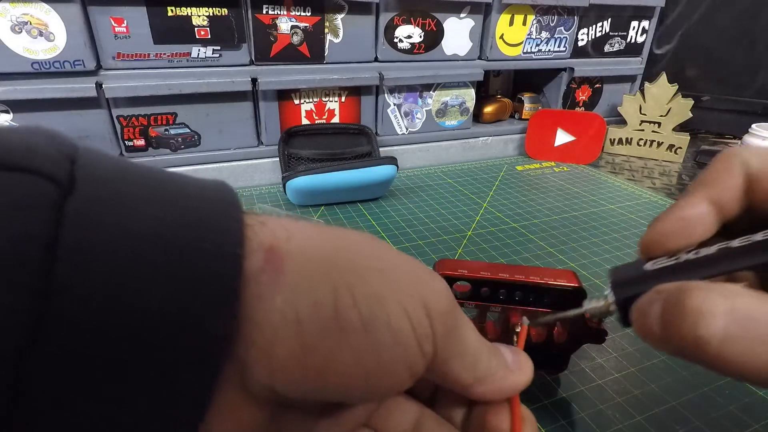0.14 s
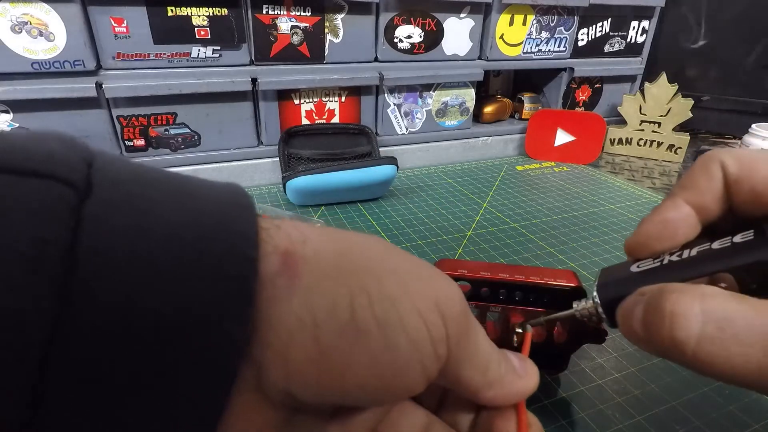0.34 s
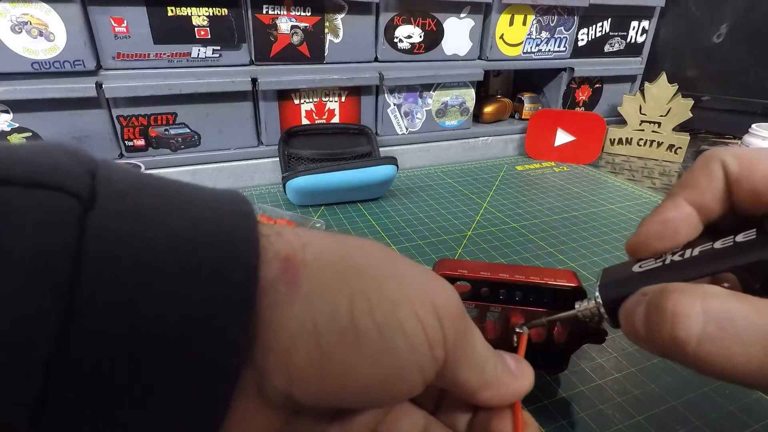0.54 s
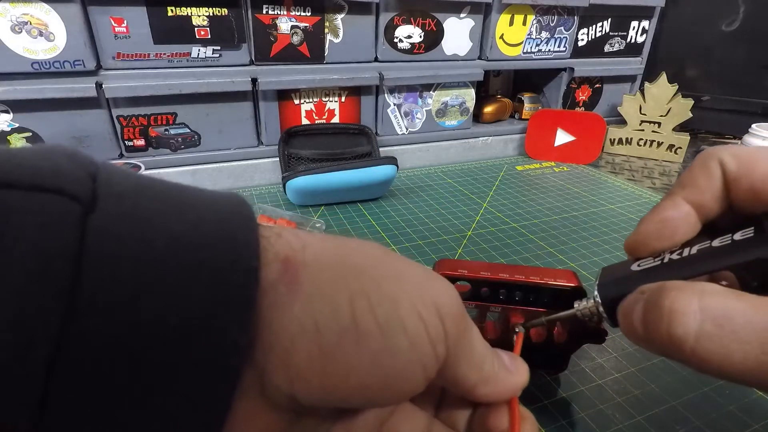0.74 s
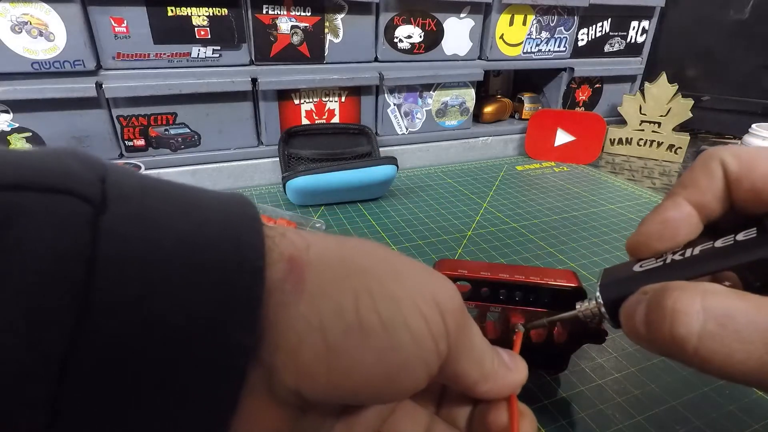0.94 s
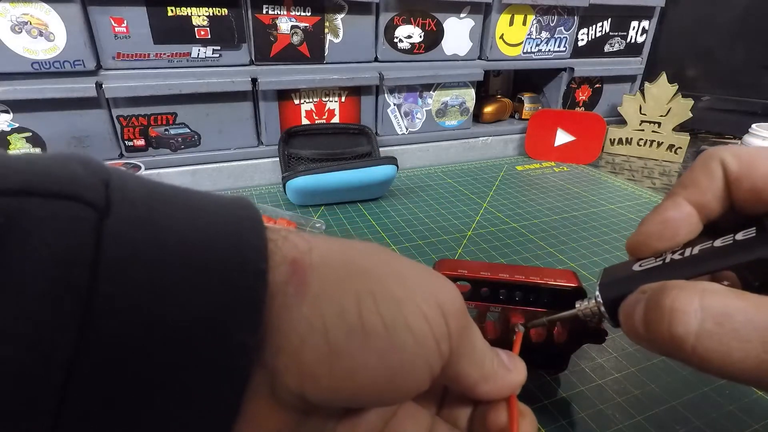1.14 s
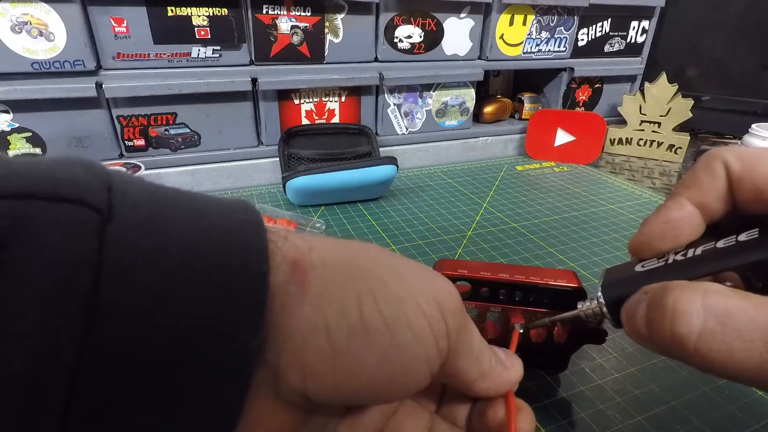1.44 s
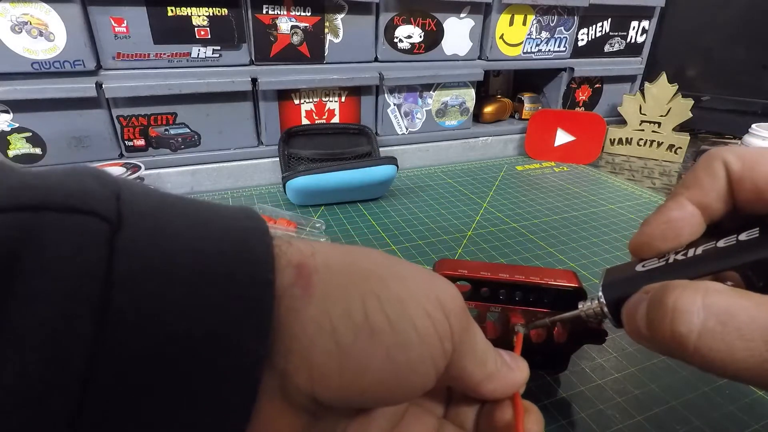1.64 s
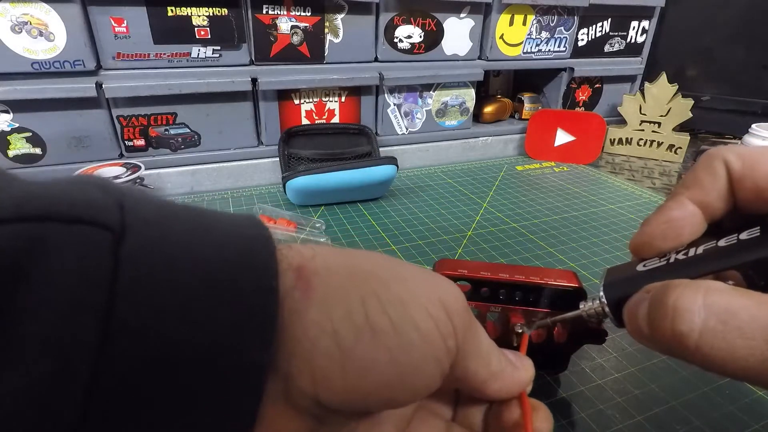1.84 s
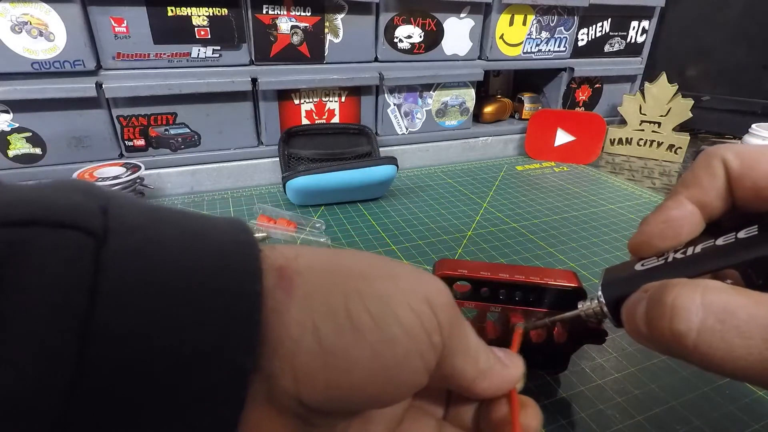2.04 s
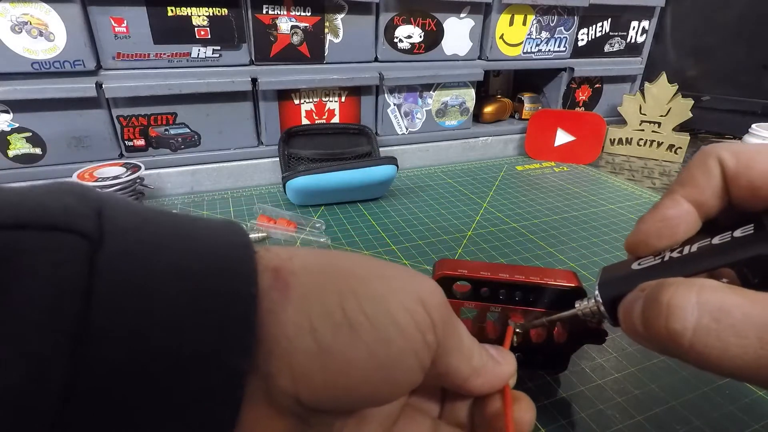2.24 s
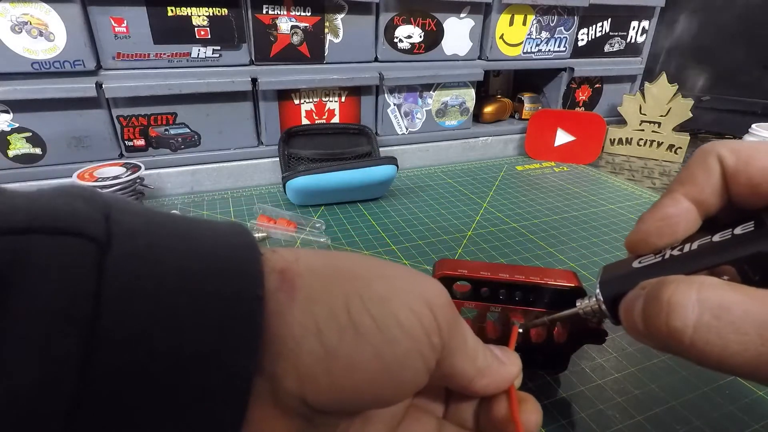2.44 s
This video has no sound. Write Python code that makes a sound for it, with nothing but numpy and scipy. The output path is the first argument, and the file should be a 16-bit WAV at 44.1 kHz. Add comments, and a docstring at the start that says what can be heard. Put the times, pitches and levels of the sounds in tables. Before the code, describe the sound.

A hot iron solders a wire: faint ticks and a dull thump, irregular muffled pops through the bench, a short crackling fizz, then denser bumps and a sharper rattling knock, picked up close over steady room hiss.

```python
"""Someone solders a wire to a small model on a workbench where a camera also stands, with steady hiss in the room.
Rumble (slow noise) fades from the start, and the hot tip makes faint clicks (short noise bursts) early on.
From 0.2 s, hands and iron nudge the work: each nudge rings the bench in a low pop; noise bands scuff and rustle.
From about 1.5 to 2 s flux sizzles and spits: noise as steam, random pulses as bubbles, short bursts as spits.
Near 2.26 s a harder knock and its rebound ring higher notes with a noise rattle; rumble briefly returns before."""
import sys
import numpy as np
from scipy import signal
from scipy.fft import rfft, irfft
from scipy.io import wavfile

SR = 44100
rng = np.random.default_rng(int(sys.argv[2]) if len(sys.argv) > 2 else 0)


def transcribe(u):
    """Save the signal u as a 16-bit wav file named by the first command-line argument.

    u: samples, shape (n,) or (channels, n), limited to [-1, 1]; the rate is SR.
    q: integer samples, one column per channel.
    """
    v = np.clip(np.atleast_2d(u).T, -1, 1)
    q = np.round(v * 32767).astype(np.int16)
    wavfile.write(sys.argv[1], SR, q)


N = 114660  # samples, 2.6 s


def amp(db):
    """Turns decibels into a gain."""
    return 10 ** (np.asarray(db) / 20)


def unit(x):
    """Scales to an average (rms) strength of 1."""
    return x / np.sqrt(np.mean(x ** 2) + 1e-20)


def bins():
    """Frequencies in the spectrum of the whole scene, in Hz."""
    return np.fft.rfftfreq(N, 1 / SR)


def spectrum(points):
    """Joins (f/Hz, value) points by straight lines on a log-frequency axis."""
    hz, value = np.transpose(points)
    return np.interp(np.log(bins() + 1), np.log(hz + 1), value)


def level(points):
    """Joins (t/s, level/dB) points into a gain for every sample."""
    s, db = np.transpose(points)
    return amp(np.interp(np.arange(N) / SR, s, db))


def blows(rows):
    """Makes one single-sample push for each (t/s, level/dB) row."""
    force = np.zeros(N)
    for s, db in rows:
        force[round(s * SR)] += amp(db)
    return force


def snaps(rows, decay_s):
    """Makes a short dying burst of stereo noise for each (t/s, level/dB) row."""
    keep_per_sample = np.exp(-1 / (decay_s * SR))
    envelope = signal.lfilter([1], [1, -keep_per_sample], blows(rows))
    return envelope * rng.standard_normal((2, N))


def ring(modes):
    """Half a second of stereo ringing after one blow: fading tones, neighbours swinging opposite ways."""
    t = np.arange(SR // 2) / SR
    total = np.zeros((2, len(t)))
    for k, (hz, t60, left_db, right_db) in enumerate(modes):
        fade = np.exp(-np.log(1000) * t / t60)  # 60 dB down after t60
        tone = (-1) ** k * np.cos(2 * np.pi * hz * t)
        total += amp([[left_db], [right_db]]) * fade * tone
    return total


LOW_CUT_HZ = 195.3  # the stand passes little below this


def through_stand(force, response, soft_hz):
    """A force rings the bench; soft contact dulls the treble and the stand removes the deep bass."""
    ringing = signal.fftconvolve(force[None], response, axes=1)[:, :N]
    low_cut = signal.butter(6, LOW_CUT_HZ, "high", fs=SR, output="sos")
    sound = signal.sosfilt(low_cut, ringing)
    softness = 1 + (bins() / soft_hz) ** 4  # halves the strength at soft_hz
    return irfft(rfft(sound) / softness, N)


# bumps of hands and iron on the work [t/s, level/dB, lift of lowest bench mode/dB, lift of highest/dB]
BUMPS = [(0.1918, 1.5, 1, 3.5), (0.2169, -29, -9, -2), (0.3131, -15.5, 4, 7), (0.355, -26.5, 6, 5),
         (0.4065, -21, -2, 2), (0.507, -22.5, 1.5, -7), (0.5854, -16.5, 7.5, 7), (0.6192, -18.5, -2, -1),
         (0.6618, -19.5, 5, 12), (0.7261, -22.5, -10, 1), (0.7668, -20.0, 2, -10),
         (0.8064, -22.0, -1, 13.5), (0.8382, -10.0, 2.5, 3.5), (0.9754, -7.5, 2, -3), (1.0131, -14, 2.5, 1),
         (1.0366, -25, -1, 0), (1.0869, -14.5, -9, 9), (1.1251, -20, 8.5, -10), (1.1975, -23.5, 9, 6),
         (1.2521, -10.5, 1, -7), (1.266, -16, 1, 5), (1.3431, -9.5, -4.5, 0), (1.4221, -16.5, -2, 3),
         (1.4545, -10, -1, 4.5), (1.5569, -30.5, 9, 0), (1.703, -14, -4.5, -5), (1.74, -27.5, 7, -5),
         (1.7956, -29, 7, -6), (1.8952, -12, 3.5, -5), (1.9013, -4, 0.5, 1), (1.9513, -14, 5.5, 1),
         (1.9766, -16, -4, -17), (2.0523, -13.5, -7, -4), (2.0777, -24, 11.5, -6), (2.094, -2, 1, -2),
         (2.1277, -18, 0, -7), (2.1743, -15.5, 6.5, -10), (2.2009, -22, 9.5, -3), (2.2172, -8.5, -4, -3),
         (2.2639, -2.5, 3.5, 2.5), (2.3023, -13.5, 1.5, -8)]
# low modes of bench and camera stand, before the stand filter [f/Hz, t60/s, left level/dB, right level/dB]
BENCH_MODES = [(161.75, 0.19, -38.5, -11.5), (194.5, 0.25, -34.5, -8), (266.7, 0.26, -66, -32)]
# short thud that opens each bump, before the stand filter [f/Hz, t60/s, left level/dB, right level/dB]
THUD_MODES = [(214, 0.064, -26, -17.5), (316, 0.02, -29.5, -24.5), (344, 0.085, -40.5, -36.5)]
# unsteady hands keep the bench trembling [t/s, level/dB]
TREMBLE_LEVEL = [(0, -74), (.18, -51), (.3, -49.5), (1.1, -52), (1.6, -49), (1.85, -48), (2.1, -46),
                 (2.35, -56), (2.6, -64)]
THUD_GROWTH = 1.33  # dB of thud per dB of bump: firm bumps are harder
TREMBLE_SOFT_HZ, TREMBLE_THUD_DB = 506, 2.5  # the tremble also stirs the thud modes, lifted by this


def bench():
    """Bumps and a faint tremble ring the same low modes; each bump favours different modes."""
    s, db, low_lift_db, high_lift_db = np.transpose(BUMPS)
    lifts_db = (low_lift_db, 0, high_lift_db)
    pops = np.zeros((2, N))
    for mode, lift_db, sign in zip(BENCH_MODES, lifts_db, (1, -1, 1)):
        force = blows(zip(s, db + lift_db))
        pops += sign * through_stand(force, ring([mode]), soft_hz=390)
    thuds = through_stand(blows(zip(s, THUD_GROWTH * db)), ring(THUD_MODES), soft_hz=424)
    tremble_ring = ring(BENCH_MODES) + amp(TREMBLE_THUD_DB) * ring(THUD_MODES)
    tremble = through_stand(rng.standard_normal(N), tremble_ring, TREMBLE_SOFT_HZ)
    return pops + thuds + unit(tremble) * level(TREMBLE_LEVEL)


# the harder knock and its small rebound [t/s, level/dB]
KNOCKS = [(2.2645, -1), (2.2744, -12.5)]
# what the knock rings with, before the stand filter [f/Hz, t60/s, left level/dB, right level/dB]
KNOCK_MODES = [(160.4, 0.4, -25, -31.5), (370, 0.049, -35.5, -32.5), (614, 0.14, -31, -27.5),
               (655, 0.055, -35, -30), (716, 0.08, -34.5, -29), (925, 0.023, -33.5, -28),
               (1060, 0.06, -43, -36), (1186, 0.049, -37.5, -43.5), (1420, .025, -46, -45)]


def knock():
    """One harder contact and its rebound also wake higher modes, opposed between the two channels."""
    return through_stand(blows(KNOCKS), ring(KNOCK_MODES), soft_hz=1690) * np.array([[-1], [1]])


# level of the sizzling flux [t/s, level/dB]
SIZZLE_LEVEL = [(1.475, -72), (1.505, -59), (1.56, -56.5), (1.6, -53.5), (1.675, -54), (1.71, -57.5),
                (1.8, -58.5), (1.85, -58.5), (1.895, -56.5), (1.93, -63), (1.98, -80)]
# larger spits of flux [t/s, level/dB]
SPITS = [(1.611, -48.5), (1.622, -52), (1.638, -50), (1.647, -52), (1.661, -47), (1.681, -49.5),
         (1.813, -51), (1.860, -53), (1.892, -49)]
# relative colour of sizzle and spits [f/Hz, level/dB]
FIZZ_COLOUR = [(1000, -32), (2500, -9.5), (4600, -6), (5600, -0.5), (6500, -1), (7200, -3.5), (8100, -3.5),
               (9500, -3), (10500, -3.5), (11200, -9.5), (13000, -7.5), (15000, -17)]
# narrow resonances in that colour [f/Hz, full width/Hz, left lift/dB, right lift/dB]
FIZZ_PEAKS = [(7140, 160, 11, -9), (7400, 220, 13.5, -16), (8950, 150, 12, -2), (10400, 470, -3, 4)]
BUBBLES_PER_S, BUBBLE_SPREAD_DB = 2500, 5
STEAM_DB = 6  # steam relative to bubbles
SPIT_DECAY_S = 0.004


def flux():
    """Tiny bursting bubbles, steam and a few larger spits share one bright colour."""
    sizes = amp(BUBBLE_SPREAD_DB * np.minimum(rng.exponential(1, N), 4))
    bursts = rng.random(N) < BUBBLES_PER_S / SR  # same moments in both channels
    bubbles = unit(rng.standard_normal((2, N)) * sizes * bursts)
    steam = amp(STEAM_DB) * rng.standard_normal((2, N))
    sizzle = unit(bubbles + steam) * level(SIZZLE_LEVEL)
    drive = sizzle + snaps(SPITS, SPIT_DECAY_S)
    peaks_db = np.zeros((2, len(bins())))
    for hz, width, left_db, right_db in FIZZ_PEAKS:
        peaks_db += np.array([[left_db], [right_db]]) / (1 + (2 * (bins() - hz) / width) ** 2)
    colour = unit(amp(spectrum(FIZZ_COLOUR) + peaks_db))
    return irfft(rfft(drive) * colour, N)


# noise bands: scuffs and sleeve rustle on the bench, and the rough rattle of the knock near 2.27 s
# [t/s, length/s, right level/dB, centre f/Hz, half width/Hz]
NOISE_BANDS = [(.192, 0.094, -40.5, 310, 55), (0.202, 0.27, -57, 480, 220), (.33, .14, -60, 1200, 800),
               (0.585, 0.12, -47, 305, 55), (.62, 0.15, -55, 1100, 800), (.68, .2, -55, 320, 60),
               (1.02, 0.065, -47, 282, 22), (1.094, .07, -41, 240, 35), (2.269, .04, -41, 700, 70),
               (2.27, .02, -54, 1220, 200)]
BAND_RISE_S, BAND_LEFT_DB = 0.0085, -4.5  # left is relative to right


def scuffs_and_rattle():
    """Scuffs, rustle and the knock's rattle: noise bands rise fast and fade, opposed between channels."""
    t, out = np.arange(N) / SR, np.zeros(N)
    for s, length, db, hz, width in NOISE_BANDS:
        rise = np.clip((t - s) / BAND_RISE_S, 0, 1)
        fade = np.clip(1 - (t - s) / length, 0, 1)
        band = 1 / (1 + ((bins() - hz) / width) ** 4)
        noise = unit(irfft(rfft(rng.standard_normal(N)) * band, N))
        out += amp(db) * rise * fade * noise
    return out * amp([[BAND_LEFT_DB], [0]]) * np.array([[-1], [1]])


# faint metal clicks of the tip finding the joint [t/s, level/dB]
CLICKS = [(.125, -58.5), (.143, -68), (.189, -57.5), (.197, -60), (.250, -61), (.269, -62), (.315, -60),
          (.368, -64), (.483, -60), (.640, -58)]
# relative colour of the clicks [f/Hz, level/dB]
CLICK_COLOUR = [(1500, -31), (3300, -8), (4400, 1), (5100, -6), (5800, 3), (6600, -12), (9000, -7),
                (14000, -30)]
CLICK_DECAY_S = 0.011


def clicks():
    """The metal tip touches the joint lightly: short noise bursts with a bright colour."""
    colour = unit(amp(spectrum(CLICK_COLOUR)))
    return irfft(rfft(snaps(CLICKS, CLICK_DECAY_S)) * colour, N)


# relative colour of the room hiss [f/Hz, level/dB]
ROOM_COLOUR = [(20, -23), (60, -16.5), (105, -7), (125, -6.5), (150, 8.5), (220, 4), (320, 3), (500, 1),
               (900, -1), (1400, -6.5), (2000, -11.5), (3000, -17.5), (5000, -19.5), (6300, -18.5),
               (7100, -14), (8000, -19.5), (10000, -18.5), (11200, -23.5), (13000, -27), (15000, -38.5)]
# likeness of left and right: 1 the same, 0 unrelated, -1 opposed [f/Hz, likeness]
ROOM_SAME = [(60, 0.98), (99, -0.63), (160, 0.11), (270, -0.37), (440, -0.68), (730, -0.86), (1190, -0.76),
             (1970, -0.5), (3240, 0.47), (5330, 0.015), (8770, -0.18), (14400, 0.02)]
# balance of the hiss [f/Hz, left minus right level/dB]
ROOM_BALANCE = [(100, 1.5), (500, 0), (2000, 0.5), (4500, -1), (7000, -1), (8500, -4), (11000, -1.5),
                (14000, 0)]
ROOM_DB = -48.5


def room():
    """Steady noise hiss, its midrange largely opposed between the two channels."""
    a, b = rfft(rng.standard_normal((2, N)))
    same = np.clip(spectrum(ROOM_SAME), -1, 1)
    pair = np.array([a, same * a + np.sqrt(1 - same ** 2) * b])
    sides_db = np.array([[.5], [-.5]]) * spectrum(ROOM_BALANCE)
    hiss = irfft(pair * amp(spectrum(ROOM_COLOUR) + sides_db), N)
    return amp(ROOM_DB) * unit(hiss)


# deep rumble that dies away, with a brief return, before the left-right shift [t/s, level/dB]
RUMBLE_LEVEL = [(0.0, -56), (1.14, -67.5), (2.21, -75), (2.23, -61), (2.6, -87)]
RUMBLE_HZ, RUMBLE_HALF_WIDTH_HZ = 24, 6.3


def rumble():
    """Noise in a very low, narrow band, a little stronger on the right."""
    band = 1 / (1 + ((bins() - RUMBLE_HZ) / RUMBLE_HALF_WIDTH_HZ) ** 2)
    noise = unit(irfft(rfft(rng.standard_normal(N)) * band, N))
    return noise * level(RUMBLE_LEVEL) * amp([[-2], [1.5]])


def scene():
    """Adds up everything heard at the bench."""
    return bench() + knock() + flux() + scuffs_and_rattle() + clicks() + room() + rumble()


EDGE_HZ = 15100  # upper edge of the sound


def record(dry):
    """The recorder's band limit: a steep filter removes the highest treble."""
    low_pass = signal.firwin(511, EDGE_HZ, window=("kaiser", 9), fs=SR)
    return signal.oaconvolve(dry, low_pass[None], "same")


dry = scene()
out = record(dry)
transcribe(out)
```